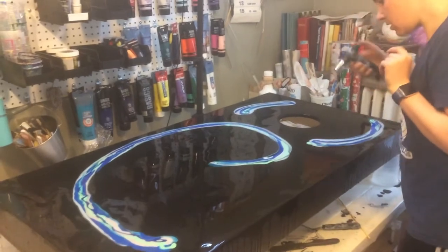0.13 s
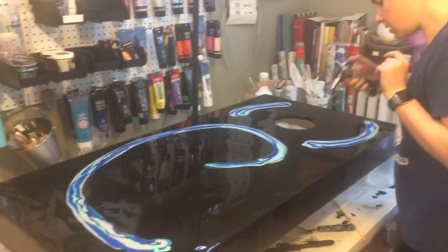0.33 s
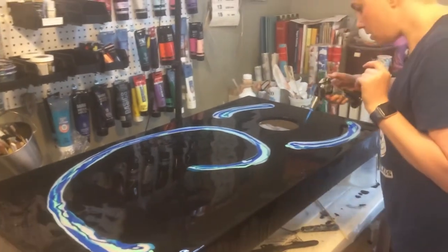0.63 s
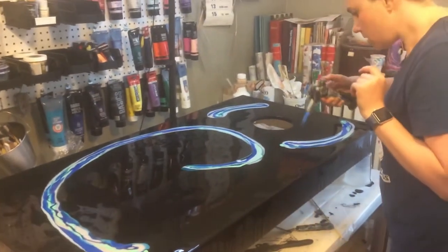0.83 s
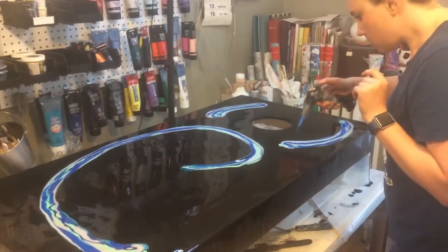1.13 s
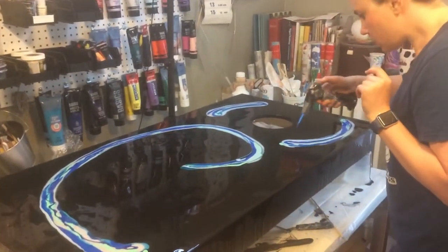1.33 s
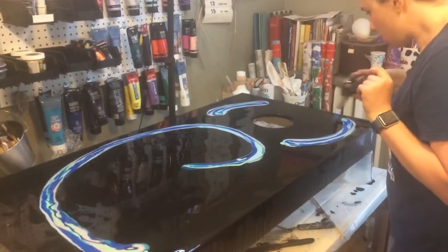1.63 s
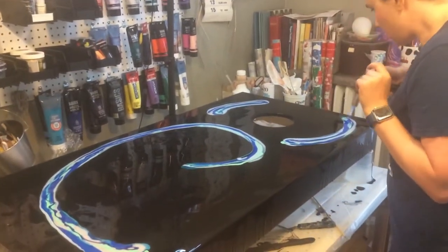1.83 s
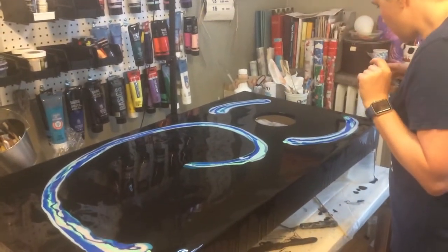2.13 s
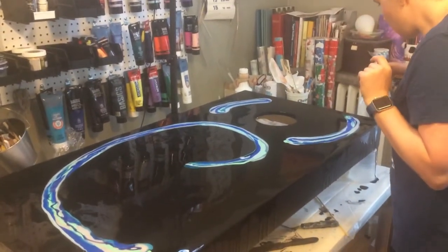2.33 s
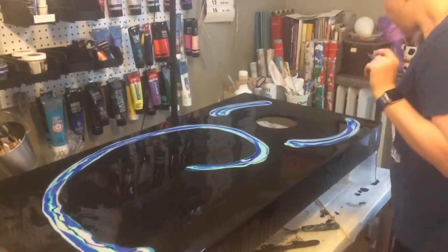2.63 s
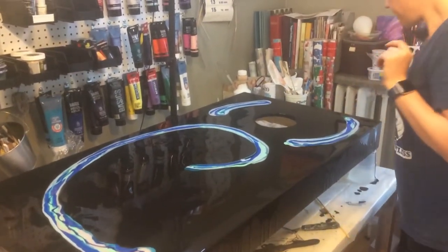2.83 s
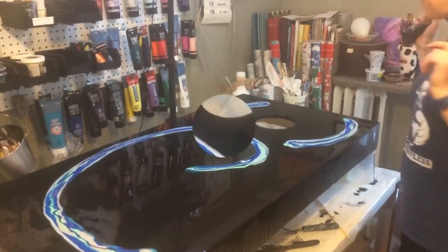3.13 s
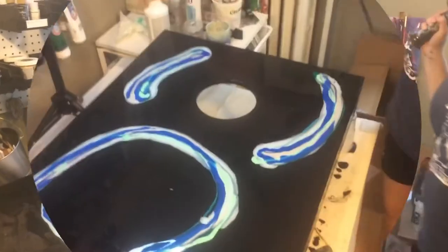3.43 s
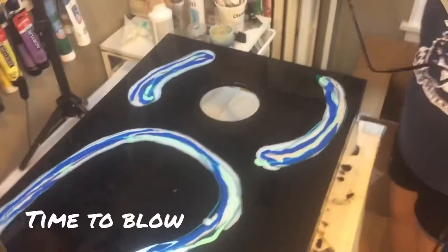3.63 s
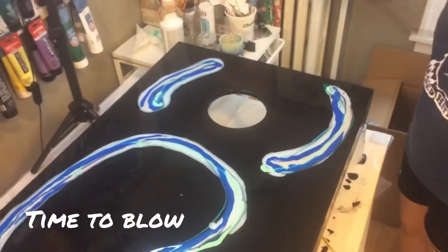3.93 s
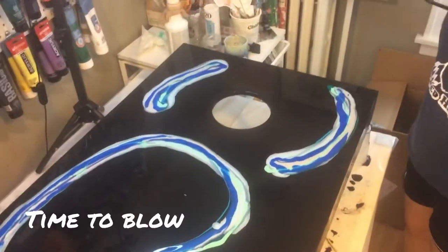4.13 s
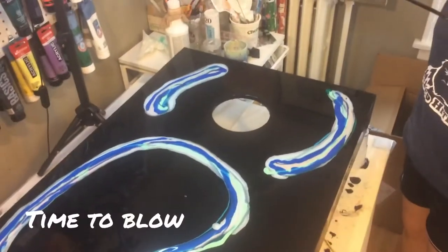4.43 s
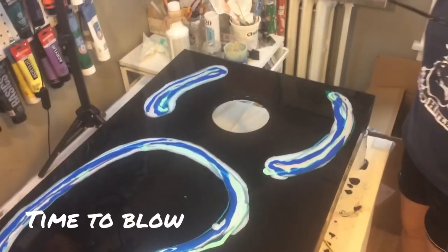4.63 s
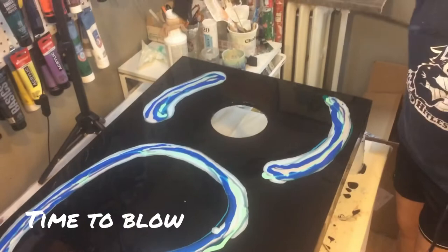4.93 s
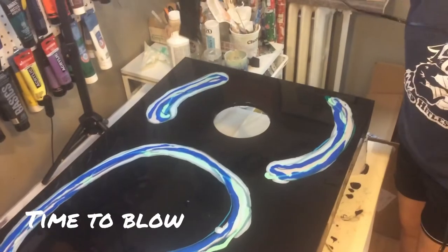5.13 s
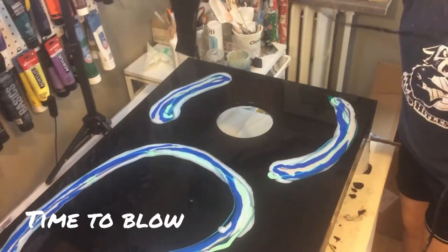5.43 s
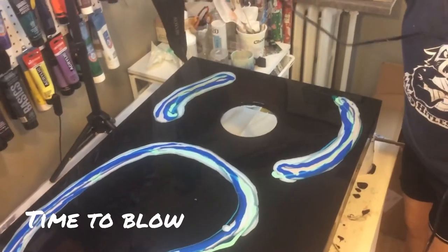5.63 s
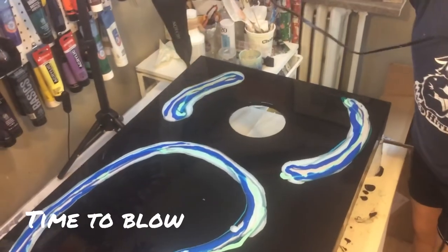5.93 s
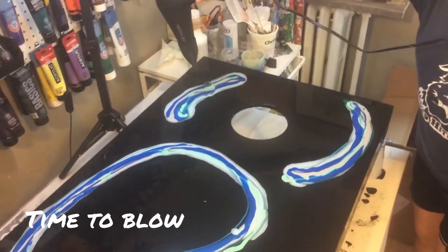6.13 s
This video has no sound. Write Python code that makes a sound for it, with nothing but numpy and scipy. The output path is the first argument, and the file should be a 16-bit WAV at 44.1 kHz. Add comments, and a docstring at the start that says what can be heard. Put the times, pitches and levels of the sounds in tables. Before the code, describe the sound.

A faint electrical hum and quiet room air lie under a few light handling clicks. At about 0.5 seconds gas begins to hiss and a hand torch lights with one loud, sharp snap. The flame burns with a soft roar and hiss, fluttering as it is waved, with its biggest puff near 2.3 seconds. At 2.5 seconds a double click shuts it off, followed by a brief sleeve rustle. At about 3 seconds a hair dryer starts with a tiny whistle and quickly rises to become the main sound, much louder than the flame. It blows until the end, near 6.5 seconds: a hollow rush, a bright hiss and a wavering motor note that grows stronger, the tone shifting as it swings above a board. Soft low bumps come around 3.7 and 5.2 seconds. One microphone hears everything in a small workroom with little echo.

```python
"""Over a faint mains hum, a hand gas torch clicks, hisses and lights with a loud snap.
Its flame roars and flutters as it is waved, until the gas is clicked off. Then a hair dryer, the
main sound, starts up and is swung about above a board: fan noise rings in its barrel, air hisses
at the nozzle and the motor sings. One microphone in a small workroom feeds both channels."""
import sys
import numpy as np
from scipy import signal
from scipy.fft import rfft, irfft, next_fast_len
from scipy.io import wavfile
from scipy.ndimage import uniform_filter1d, map_coordinates

SR = 44100
rng = np.random.default_rng(int(sys.argv[2]) if len(sys.argv) > 2 else 0)


def generate_wav(sig):
    """Save sig (samples, or channels by samples) to the path in sys.argv[1] as 16-bit PCM at SR."""
    pcm = np.round(np.clip(np.atleast_2d(sig).T, -1, 1) * 32767).astype(np.int16)
    wavfile.write(sys.argv[1], SR, pcm)


N = 276948
T = np.arange(N) / SR
GAS_ON_S, LIT_S, GAS_OFF_S, DRYER_ON_S = 0.455, 0.56, 2.48, 2.964


# The dryer's swing: (time [s], throat pitch [Hz], throat level [dB], board level [dB], motor level [dB])
SWING = [(2.97, 540, -40, -54, -68), (3.35, 656, -46, -58.5, -73), (3.75, 666, -44.5, -57, -66),
         (4.05, 590, -41.5, -57.5, -59.5), (4.35, 590, -39, -60.5, -57), (4.85, 630, -44.5, -51.5, -55),
         (5.25, 734, -42, -51, -55.5), (5.7, 623, -44.5, -53, -54), (6.08, 550, -44, -53.5, -51),
         (6.28, 590, -39.5, -54.5, -52.5)]
def dryer():
    """The fan speeds up and its roar and hiss grow; the sound shifts as the dryer is swung."""
    _, throat_db, board_db, motor_db = curves(SWING, T)
    running_s = np.maximum(T - DRYER_ON_S, 0)
    speed = 1 - np.exp(-(running_s + 0.24) / 0.28)  # 1 is full speed; already turning when first heard
    fade_in = np.clip(running_s / 0.29, 0, 1)
    roar = air_stream() + barrel() + throat(throat_db) + air_on_board(board_db)
    roar *= amp(0.79 * wobble(4.6)) * fade_in * speed ** 3.8
    hiss = nozzle(speed, running_s)
    whine = fade_in * motor(speed, motor_db)
    return moving_echo(roar, step_s=0.3, direct=1.55) + hiss + whine


def throat(level_db):
    """A broad ringing band slides as the dryer's mouth turns to and from the board."""
    def band(hz, t):
        centre_hz = curves(SWING, t)[0]
        return (hz > 500) / (1 + ((hz - centre_hz) / 160) ** 2)
    return amp(level_db) * noise(band, patchy_db=1.0, size=2048, wide=3, long=12)


# Tone of the rushing air: (frequency [Hz], relative level [dB])
STREAM_TONE = [(600, -120), (800, 2), (1400, -2), (1850, -1), (3000, -7), (5000, -8.5), (6000, -120)]
def air_stream():
    """Rushing air fills the gaps between the barrel's notes."""
    return amp(-44.5) * noise(tone(STREAM_TONE), patchy_db=2.5)


# Notes the barrel rings at: (pitch [Hz], width [Hz], relative level [dB])
BARREL_NOTES = [(450, 65, -47.5), (1040, 180, -52), (1250, 210, -52.5), (1460, 55, -56), (1590, 94, -51),
                (2220, 320, -48), (2720, 160, -52.5), (3330, 180, -60), (3820, 170, -63)]
# One note briefly stands out or sinks: (time [s], pitch [Hz], change [dB], length [s])
NOTE_SWELLS = [(3.07, 450, 13, 0.27), (3.13, 1590, 8, 0.14), (3.65, 1590, 5, .4), (3.744, 1250, 8, 0.46),
               (4.308, 450, 4, 0.42), (4.4, 1590, 4, .4), (4.8, 1040, 4.5, 0.47), (5.056, 1460, 12, 0.39),
               (5.45, 1590, 4, .3), (5.947, 2220, -8, 0.32), (6.05, 2720, 4, 0.46), (6.15, 1040, 5, 0.36)]
def barrel():
    """Fan noise rings in the barrel like in a pipe; each note drifts in level as the mouth turns."""
    def ringing(hz, t):
        power = 0
        for pitch, width, db in BARREL_NOTES:
            swell_db = sum(change * bell(t, s, length)
                           for s, note, change, length in NOTE_SWELLS if note == pitch)
            level = amp(db + swell_db + 0.7 * np.interp(t, T, wobble(2.48)))
            power += level ** 2 / width / (1 + (2 * (hz - pitch) / width) ** 2) ** 2
        return np.sqrt(power)
    return amp(-41) * noise(ringing, patchy_db=2.33, size=2048, wide=5, long=5)


# Tone of the air hitting the board: (frequency [Hz], relative level [dB])
BOARD_TONE = [(40, -120), (60, -25), (110, -33.5), (200, -12), (270, -16), (305, -5.5), (336, 2.5),
              (358, -6), (400, -18.5), (440, -120)]
def air_on_board(level_db):
    """Air washes over the board with a low rumble."""
    return amp(level_db) * noise(tone(BOARD_TONE), patchy_db=0)


# Tone of the nozzle's hiss: (frequency [Hz], relative level [dB])
NOZZLE_TONE = [(1760, -25), (3000, -7.5), (3240, -2), (3520, -10.5), (3810, -2.5), (4830, -2.5), (7000, -4),
               (8110, -0.5), (11000, 0.5), (15100, -1), (16000, -9.5)]
def nozzle(speed, running_s):
    """Air hisses out of the nozzle, slowly getting louder."""
    level = amp(-39.5 + 0.42 * running_s + 0.37 * wobble(1.9))
    fade_in = np.clip(running_s / 0.73, 0, 1)
    return level * fade_in * speed ** 1.7 * noise(tone(NOZZLE_TONE), patchy_db=2.5, wide=2, long=5)


def motor(speed, level_db, full_speed_hz=244.1):
    """The motor sings one wavering note, one wave for each turn of its shaft."""
    phase = 2 * np.pi * full_speed_hz * np.cumsum(speed) / SR + 0.29 * wobble(4.06)
    return np.sqrt(2) * amp(level_db + 0.86 * wobble(12)) * np.sin(phase)


# Tones of the gas jet, the flame's roar and its flutter: (frequency [Hz], relative level [dB])
JET_TONE = [(3000, -120), (4200, -17.5), (4800, -6.5), (5080, -2), (5400, -7), (6000, -8.5), (6800, -13),
            (7700, -3.5), (8300, -6), (9400, -11), (10700, -2.5), (11300, -7.5), (12200, -16), (13500, -1),
            (15200, -5), (16000, -17.5)]
ROAR_TONE = [(150, -39.5), (260, -6), (307, 2), (411, -5), (545, -3.5), (603, -13), (688, -4), (767, -10.5),
             (1010, -5.5), (1100, -21), (1900, -25), (2470, -53), (4180, -120)]
FLUTTER_TONE = [(700, -120), (900, -3), (1030, 0), (1200, 4.5), (1800, -6), (3000, -11), (4500, -17),
                (6000, -120)]
# The waved flame puffs up: (time [s], level [dB], length [s])
FLAME_PUFFS = [(0.73, -78, 0.089), (1.084, -80, 0.056), (1.273, -72, 0.058), (1.452, -73, 0.065),
               (1.57, -71, .05), (1.76, -72, .05), (1.957, -66, 0.062), (2.307, -58.5, 0.092)]
def torch():
    """Gas hisses once the valve opens; the lit flame roars, flutters and puffs as it is waved."""
    pressure = amp(-1.5 * (T - LIT_S))  # the gas pressure slowly sags
    gas_on = gate(GAS_ON_S, GAS_OFF_S, rise_s=0.023, die_s=0.4)
    burning = gate(LIT_S, GAS_OFF_S, rise_s=0.018, die_s=0.4)
    hiss = amp(-62.5) * pressure * noise(tone(JET_TONE), patchy_db=3.5, wide=3, long=6)
    roar_level = amp(-59.5 + 0.75 * wobble(24.97)) * pressure
    roar = roar_level * noise(tone(ROAR_TONE), patchy_db=3.5, size=2048, wide=2, long=12)
    puffs = sum(amp(db) * bell(T, s, length) for s, db, length in FLAME_PUFFS)
    flutter = (amp(-72) + puffs) * noise(tone(FLUTTER_TONE), patchy_db=2.5)
    return gas_on * hiss + burning * (roar + flutter)


# The igniter's hammer hits and bounces: (time [s], relative level [dB], rattle length [s])
HAMMER_HITS = [(0.5582, -15.5, 0.012), (0.568, -20.5, 0.012)]
# Tone of the snap: (frequency [Hz], boost or cut [dB])
SNAP_TONE = [(290, -58.5), (500, -41.5), (1180, -20), (1450, -11.5), (1700, -2.5), (1950, -10),
             (2430, -13.5), (3750, -9), (4090, -17.5), (4730, -5.5), (5800, -11.5), (9360, -3), (10800, -7),
             (12500, 2.5), (16000, -4.5)]
def igniter():
    """A spring hammer cracks, rattles for a moment and echoes in the room."""
    t = np.arange(SR // 20) / SR
    snaps = np.zeros(N)
    for s, db, length in HAMMER_HITS:
        rattle = amp(-60 * np.maximum(t - length, 0) / 0.0066) * rng.standard_normal(len(t))
        snaps += place_with_echo(s, amp(db) * rattle, echo_db=-1.0)
    return filtered(snaps, lambda hz: amp(along(SNAP_TONE, hz)))


# Notes of the torch's body and trigger: (pitch [Hz], width [Hz], relative level [dB])
BODY_NOTES = [(935, 250, -13.5), (1310, 260, -4), (1560, 320, -7)]
TRIGGER_NOTES = [(2380, 330, 7.5), (2930, 400, -10)]
# Touches on the torch: (time [s], body [dB], trigger [dB], high tick [dB], low knock [dB])
TOUCHES = [(0.052, -70.5, -75.5, -77, -66), (0.146, -94, -97, -93, -89), (0.285, -73, -83, -98, -69.5),
           (0.395, -78, -82, -69, -91), (0.412, -71.5, -88, -83, -90), (0.561, -62, -73, -78.5, -60),
           (2.489, -58.5, -72, -58.5, -84), (2.517, -60.5, -61, -63.5, -82),
           (2.844, -82.5, -95, -95.5, -66.5), (2.864, -99, -100.5, -73.5, -87)]
def handling():
    """Each touch rings the torch's body and trigger, with a high tick and a low knock."""
    def dull(notes):  # soft fingers make little treble
        return lambda hz: resonances(notes)(hz) / (1 + 1j * hz / 2500) ** 2
    tick = resonances([(9000, 18000, 0)])
    knock = dull([(178, 200, -0.5), (340, 190, -0.5), (700, 380, -10.5)])
    parts = [dull(BODY_NOTES), dull(TRIGGER_NOTES), tick, knock]
    t = np.arange(SR // 20) / SR
    decay = 3 * amp(-60 * t / 0.005) + amp(-60 * t / 0.051)  # sharp contact, then a short rattle
    clicks = np.zeros(N)
    for s, *levels_db in TOUCHES:
        click = sum(amp(db) * unit(filtered(decay * rng.standard_normal(len(t)), part))
                    for db, part in zip(levels_db, parts))
        clicks += place_with_echo(s, click, echo_db=1.5)
    return clicks


def sleeve(start_s=2.765):
    """A sleeve brushes past with a short, bright rustle."""
    age_s = np.maximum(T - start_s, 0)
    stroke = np.minimum(age_s / 0.023, 1) * np.exp(-age_s / 0.064)
    return amp(-61) * stroke * filtered(rng.standard_normal(N), resonances([(4000, 4100, 0.005)]))


# Thin whistles: (time [s], pitch [Hz], level [dB], length [s])
WHISTLES = [(2.988, 3200, -72, 0.026), (3.09, 3220, -59, .04)]
def whistles():
    """Short, unsteady whistles sound as the dryer's roar comes up."""
    waver = wobble(120)
    return sum(amp(db) * bell(T, s, length) * np.sin(2 * np.pi * hz * T + waver)
               for s, hz, db, length in WHISTLES)


# Soft bumps: (time [s], level [dB])
STAND_BUMPS = [(3.149, -51), (3.63, -46), (3.719, -42), (5.199, -52), (5.349, -64)]
def stand_bumps():
    """Each bump comes through the stand as one low push that does not ring."""
    age = np.arange(SR // 10) / SR / 0.004  # counted in steps of 4 ms
    push = age * (2 - age) * np.exp(-age)
    return sum(place(s, amp(db) * push) for s, db in STAND_BUMPS)


# The hum swells or sinks: (time [s], multiple of the mains pitch, change [dB], length [s])
HUM_CHANGES = [(0.623, 1, 6, .3), (3.7, 1, 10, .5), (4.2, 1, 14, 0.86), (5.3, 1, 12, 0.46),
               (6.1, 1, 8, 0.56), (0.65, 2, 5.5, .3), (1.1, 2, -3, .5), (1.5, 2, 4, .4), (2.25, 2, 4, 0.25),
               (3.697, 2, 4.5, 0.61), (5.4, 2, -6, 1.3)]
def mains_hum(mains_hz=60):
    """The mains hums at 1, 2 and 4 times its pitch; the top note dies away as the dryer starts."""
    def swell_db(multiple):
        return sum(db * bell(T, s, length) for s, k, db, length in HUM_CHANGES if k == multiple)
    phase = 2 * np.pi * mains_hz * T
    low = amp(-80 + swell_db(1) + 2.2 * wobble(9.6)) * np.sin(phase + 0.6 * wobble(6))
    middle = amp(-73.5 + swell_db(2) + 2.5 * wobble(5.5)) * np.sin(2 * phase + 0.69 * wobble(6.7))
    top = amp(-70.5 + 2.2 * wobble(8)) * np.sin(4 * phase + 0.4 * wobble(7))
    return np.sqrt(2) * (low + middle + top * gate(0, 3.16, rise_s=0.001, die_s=1.2))


# Tone of the quiet room: (frequency [Hz], relative level [dB])
ROOM_TONE = [(15, -38), (25, -8.5), (130, -18), (185, -2.5), (249, -13), (293, -17.5), (363, -11.5),
             (439, -26.5), (962, -24.5), (1230, -23.5), (1520, -31.5), (6740, -35.5), (11300, -32),
             (12200, -33), (16000, -38)]
def room_air():
    """A faint, steady rush lies under everything."""
    return amp(-68.5) * noise(tone(ROOM_TONE), patchy_db=0.5)


# How long the walls echo: (frequency [Hz], time to fall by 60 dB [s])
ECHO_TIMES = [(200, 0.37), (1500, 0.24), (10000, .2)]
def wall_echo():
    """One random echo from the walls: each frequency dies at its own speed."""
    hz, t, spectrum = signal.stft(rng.standard_normal(SR // 2), SR, nperseg=256)
    decay = amp(-60 * t / along(ECHO_TIMES, hz)[:, None])
    echo = signal.istft(spectrum * decay, SR, nperseg=256)[1]
    return echo / np.linalg.norm(echo)


def moving_echo(sound, step_s, direct):
    """The moving dryer meets new room echoes: a fresh one blends in at every step."""
    out = direct * sound
    for s in np.arange(DRYER_ON_S, T[-1] + step_s, step_s):
        start, end = round((s - step_s) * SR), round((s + step_s) * SR)
        blend = np.sqrt(np.clip(1 - abs(T[start:end] - s) / step_s, 0, 1))
        out += place(s - step_s, signal.fftconvolve(sound[start:end] * blend, wall_echo()))
    return out / np.sqrt(1 + direct ** 2)


def place_with_echo(s, burst, echo_db):
    """A burst at time s; the walls answer about 3 ms later."""
    echo = amp(echo_db) * signal.fftconvolve(burst, np.pad(wall_echo(), (130, 0)))
    return place(s, burst) + place(s, echo)


def place(s, sound):
    """A silent track with the sound starting at time s."""
    return np.pad(sound, (round(s * SR), N))[:N]


def noise(gain, patchy_db, size=1024, wide=8, long=8):
    """Noise shaped by gain(Hz, s), with random louder and softer patches of wide bands by long frames."""
    hz, t, spectrum = signal.stft(rng.standard_normal(N), SR, nperseg=size)
    patches = uniform_filter1d(rng.standard_normal(spectrum.shape), wide, 0)
    patches = unit(uniform_filter1d(patches, long, 1))
    shaped = spectrum * gain(hz[:, None], t) * amp(patchy_db * patches)
    return unit(signal.istft(shaped, SR, nperseg=size)[1][:N])


def tone(table):
    """Turns a tone table into a steady gain for noise()."""
    return lambda hz, t: amp(along(table, hz))


def resonances(notes):
    """A filter that rings at each (pitch [Hz], width [Hz], level [dB])."""
    return lambda hz: sum((-1) ** k * amp(db) * 1j * hz * width / (pitch**2 - hz**2 + 1j * hz * width)
                          for k, (pitch, width, db) in enumerate(notes))


def filtered(sound, response):
    """Scales each frequency of the sound by response(Hz)."""
    size = next_fast_len(len(sound) + SR // 2)
    return irfft(rfft(sound, size) * response(np.fft.rfftfreq(size, 1 / SR)), size)[:len(sound)]


def along(points, hz):
    """Reads between (frequency, value) points on a pitch-like scale."""
    frequencies, values = np.transpose(points)
    return np.interp(np.log(hz + 1), np.log(frequencies + 1), values)


def curves(rows, t):
    """Each column after the time, read at times t."""
    times, *columns = np.transpose(rows)
    return [np.interp(t, times, column) for column in columns]


def wobble(rate):
    """A smooth curve through rate random points a second."""
    return map_coordinates(rng.standard_normal(int(N * rate / SR) + 4), [T * rate])


def gate(on_s, off_s, rise_s, die_s):
    """Rises at on_s; after off_s it falls 60 dB every die_s."""
    return np.clip((T - on_s) / rise_s, 0, 1) * amp(-60 * np.maximum(T - off_s, 0) / die_s)


def bell(t, s, length):
    """A smooth rise and fall around time s."""
    return np.exp(-(2 * (t - s) / length) ** 2)


def amp(db):
    """Turns decibels into a multiplier."""
    return 10 ** (np.asarray(db) / 20)


def unit(x):
    """Scales x to an average power of 1."""
    return x / np.sqrt(np.mean(np.abs(x) ** 2) + 1e-20)


def scene():
    """The torch, then the dryer, over the sound of the room."""
    mono = torch() + igniter() + handling() + sleeve()
    mono += whistles() + dryer() + stand_bumps()
    mono += mains_hum() + room_air()
    return np.array([mono, mono])


def record(dry):
    """One microphone drops the deepest bass and the highest treble."""
    bass_hz, top_hz, edge_hz = 42, 15750, 120
    def microphone(hz):
        treble_cut = np.sin(np.pi / 2 * np.clip((top_hz + edge_hz - hz) / (2 * edge_hz), 0, 1)) ** 2
        return treble_cut / np.sqrt(1 + (bass_hz / (hz + 1)) ** 6)
    heard = filtered(dry.mean(axis=0), microphone)
    return np.array([heard, heard])


dry = scene()
out = record(dry)
generate_wav(out)
```